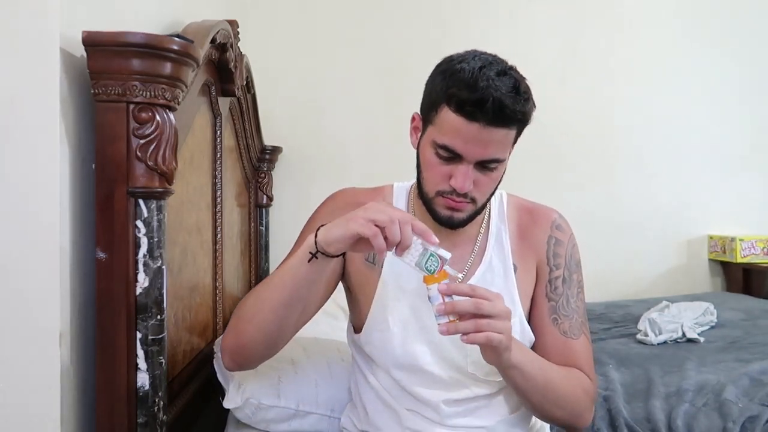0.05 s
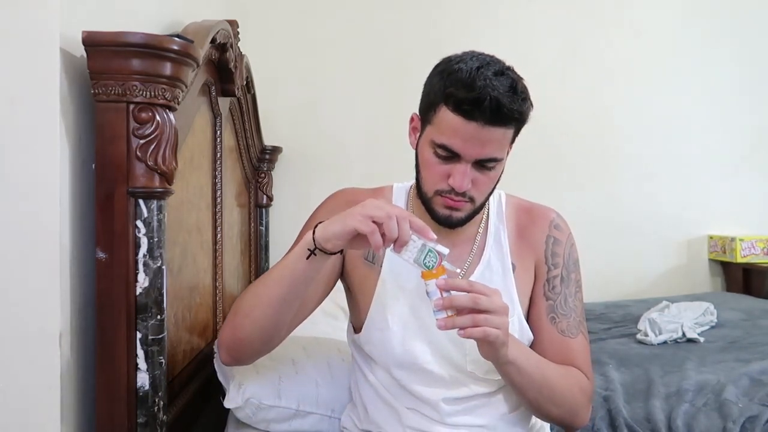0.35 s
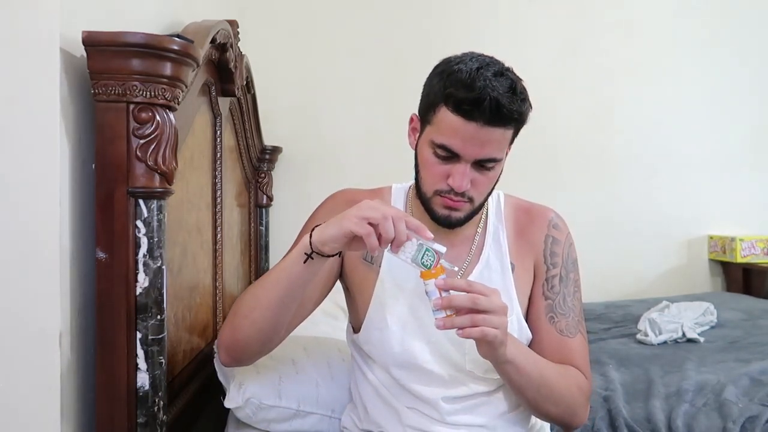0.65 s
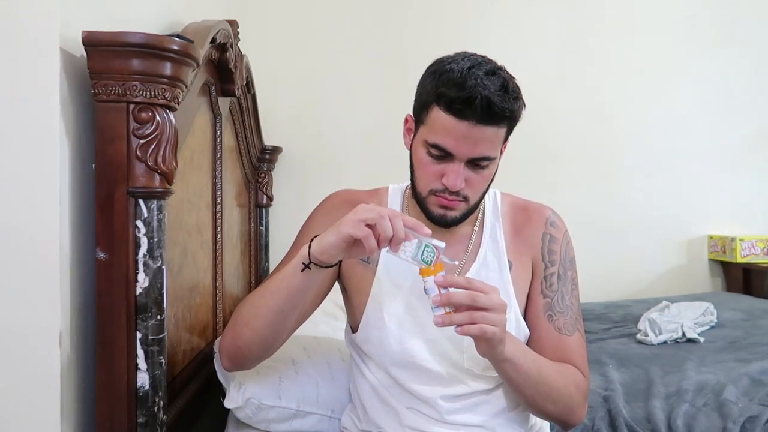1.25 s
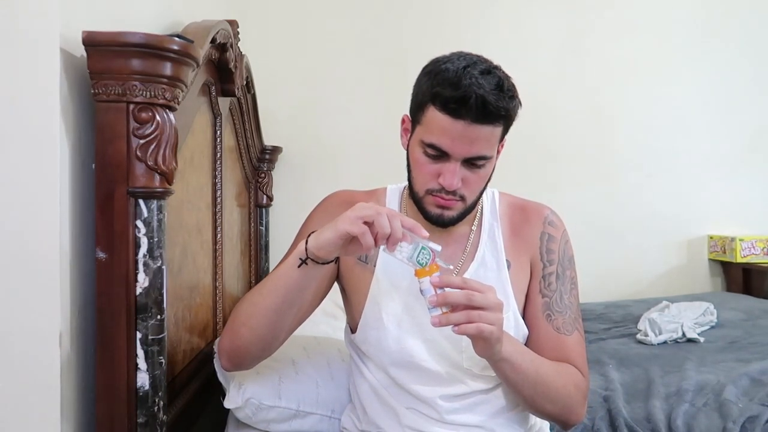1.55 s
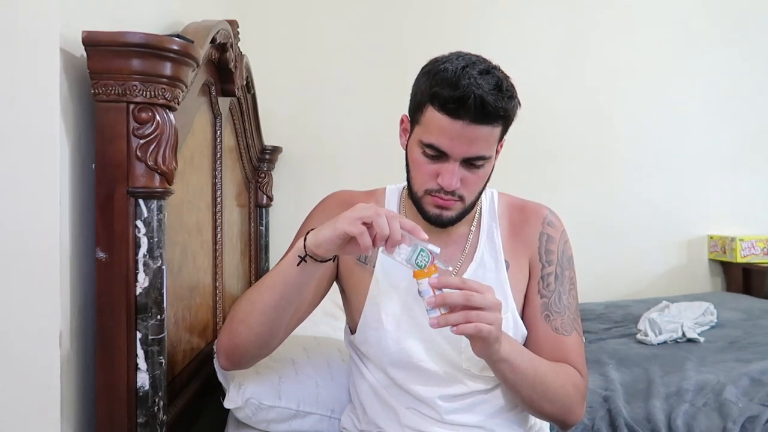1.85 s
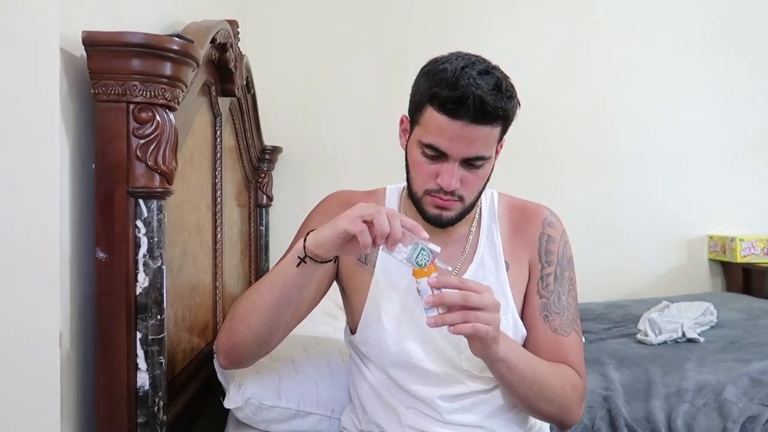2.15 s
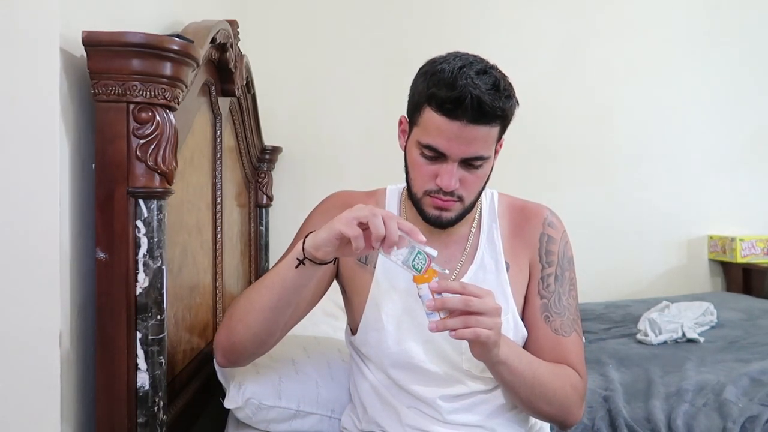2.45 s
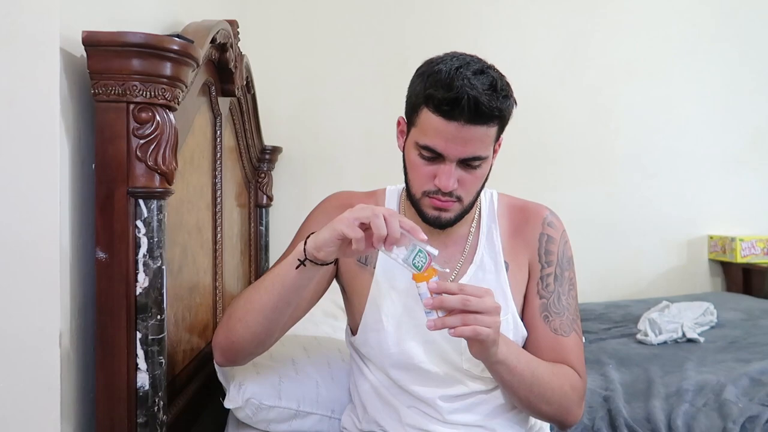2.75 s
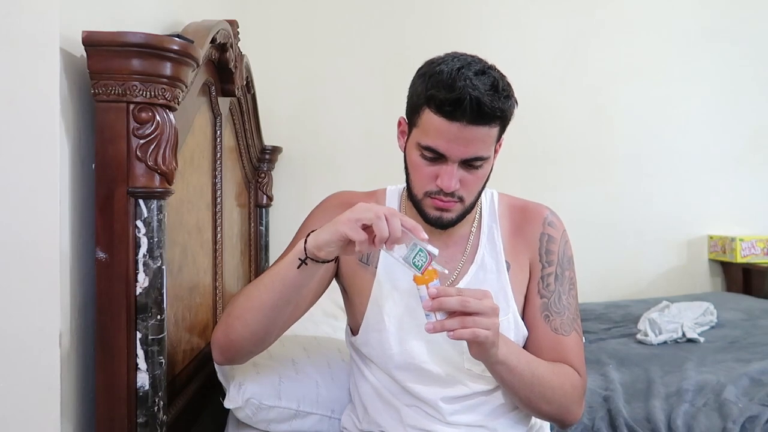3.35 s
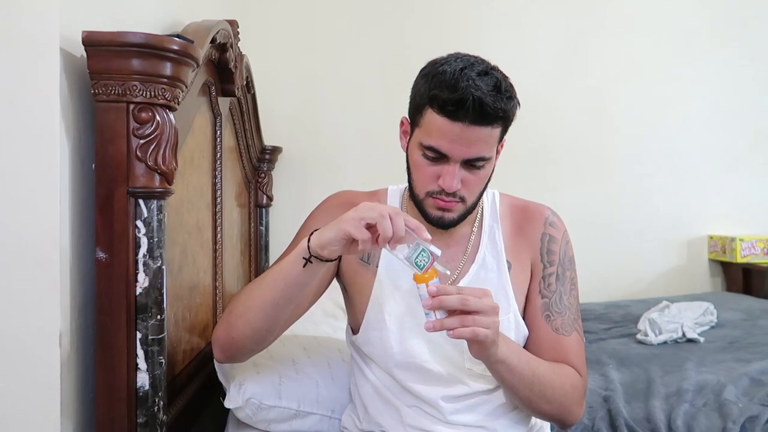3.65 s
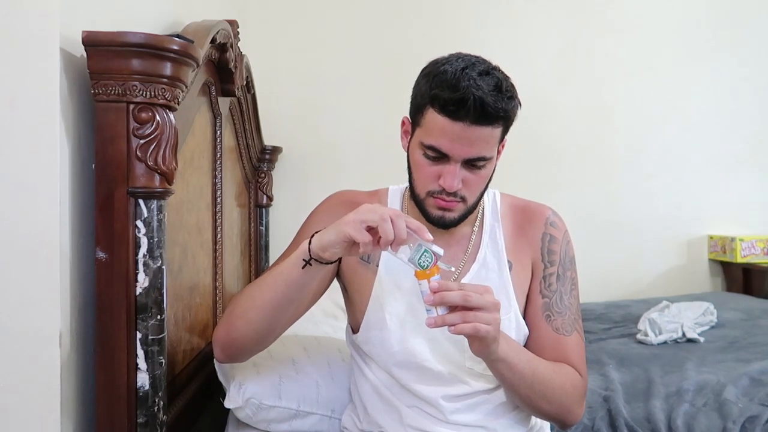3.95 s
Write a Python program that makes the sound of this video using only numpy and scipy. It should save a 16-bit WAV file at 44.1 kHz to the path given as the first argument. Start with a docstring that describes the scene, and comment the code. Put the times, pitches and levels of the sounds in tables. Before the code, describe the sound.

Light plastic clicking and rattling with short scrapes as a small container is handled.

```python
"""A small plastic container worked over a pill bottle

A man works the container in a bedroom. Hard bits strike its shell, whose damped modes tick near 3 kHz.
Scraping strokes, about six a second, grow stronger; their friction rasps over a hollow tone near 1 kHz.
Close walls reflect the sound, over a low steady hum."""
import sys
import numpy as np
from scipy import signal
from scipy.fft import rfft, irfft
from scipy.io import wavfile

SR = 44100
rng = np.random.default_rng(int(sys.argv[2]) if len(sys.argv) > 2 else 0)


def wrap_up_sound(samples):
    """Save the sound to the file named by the first command line argument, as 16-bit audio."""
    columns = np.atleast_2d(samples).T
    # keep every value between -1 and 1, then stretch to whole-number steps
    tamed = np.clip(columns, -1, 1)
    steps = np.round(tamed * 32767).astype(np.int16)
    wavfile.write(sys.argv[1], SR, steps)


N = 176400
BOUNCE_S = .0072  # delay of the reflection from a hard surface close by

# modes of the plastic shell: pitch_ratio, level_db, t60_s
SHELL_MODES = [(.92, -4, 0.019), (1.05, 3, 0.011), (.74, -29.5, 0.0023), (.47, -15, 0.012)]
# sinking pitch of the shell: time_s, pitch_hz
SHELL_PITCH = [(0, 3380), (1.6, 3363), (2.5, 3105), (3.3, 2993), (3.6, 2970), (3.9, 2720)]
# scraping strokes: start_s, rise_s, fall_s, hollow_db, rasp_db
SCRAPE_STROKES = [(.0, .03, 0.077, -35, -61), (.085, 0.014, 0.061, -44, -39),
                  (0.309, 0.02, 0.074, -34.5, -39), (.462, 0.017, 0.065, -27, -24),
                  (0.494, 0.026, 0.051, -35, -38), (.61, 0.032, 0.084, -33, -40),
                  (.945, 0.0084, 0.038, -35.5, -37), (1.125, 0.012, 0.067, -35, -33),
                  (1.294, 0.0095, 0.068, -33, -27.5), (1.39, 0.016, 0.039, -37, -43),
                  (1.45, 0.023, 0.063, -32, -31.5), (1.51, 0.025, 0.074, -39, -33),
                  (1.608, 0.011, 0.12, -28, -29), (1.765, 0.025, 0.17, -34.5, -31),
                  (1.933, 0.025, 0.14, -24, -24), (2.093, 0.042, 0.043, -21.5, -24.5),
                  (2.22, 0.026, 0.056, -32, -47), (2.3, 0.019, 0.1, -33, -28),
                  (2.395, 0.023, 0.049, -24.5, -24), (2.414, 0.036, 0.099, -19.5, -23),
                  (2.569, 0.046, 0.059, -24, -25), (2.713, 0.04, 0.093, -19.5, -22),
                  (2.888, 0.028, 0.049, -18.5, -21.5), (3.028, 0.034, 0.062, -17.5, -18.5),
                  (3.183, 0.037, 0.12, -19.5, -20.5), (3.344, 0.057, 0.087, -18.5, -21.5),
                  (3.559, 0.018, 0.19, -30, -30.5), (3.675, 0.033, 0.1, -20.5, -26),
                  (3.755, .035, 0.13, -33, -35), (3.839, 0.051, 0.056, -21, -26),
                  (3.937, 0.014, .08, -30, -29.5)]
# spectrum of rustles and scattered treble: frequency_hz, level_db
TREBLE_SPECTRUM = [(1000, -25), (2000, 4), (4000, 6.5), (5500, 9.5), (7500, 2.5), (8800, -12), (10000, -8),
                   (12500, -45), (16000, -35)]


def amp(db):
    """Amplitude ratio of a level in decibels."""
    return 10 ** (np.asarray(db) / 20)


def unit(x):
    """Normalisation to an rms of 1."""
    return x / np.sqrt(np.mean(x ** 2) + 1e-20)


def at_hz(points, hz):
    """Interpolation on a logarithmic frequency axis."""
    frequencies, values = np.transpose(points)
    return np.interp(np.log(hz + 1), np.log(frequencies), values)


def curve(points):
    """Linear interpolation in time, one value a sample."""
    return np.interp(np.arange(N) / SR, *np.transpose(points))


def add(mix, start_s, sound):
    """Superposition of a delayed sound on a mix."""
    part = mix[max(round(start_s * SR), 0):][:len(sound)]
    part += sound[:len(part)]


def colour(x, spectrum):
    """Minimum-phase filtering to a given spectrum."""
    size = 8192
    log_gain = np.log(amp(at_hz(spectrum, abs(np.fft.fftfreq(size, 1 / SR)))))
    taps = np.fft.ifft(np.exp(np.conj(signal.hilbert(log_gain)))).real[:size // 2]
    return signal.fftconvolve(x, taps)[:len(x)]


def impulses(count, per_s):
    """A Poisson train of impulses of random sign."""
    return rng.choice([-1., 1.], count) * (rng.random(count) < per_s / SR)


def grains(per_s, spread_db):
    """Shot noise: tiny random impacts of uneven size."""
    size = amp(spread_db * np.minimum(rng.exponential(1, N), 4))
    return unit(size * impulses(N, per_s))


def swell(rise_s, fall_s):
    """A smooth rise, then exponential decay by 17 dB in each fall_s."""
    t = np.arange(SR // 2) / SR
    attack = np.sin(np.pi / 2 * np.minimum(t / rise_s, 1)) ** 2
    return attack * amp(-17 * np.maximum(t - rise_s, 0) / fall_s)


def resonances(modes):
    """Impulse response of damped resonators: the narrower the band, the longer the ring."""
    t = np.arange(SR // 4) / SR
    return sum(amp(db) * 2 * np.pi * width / SR * np.exp(-np.pi * width * t) * np.cos(2 * np.pi * hz * t)
               for hz, width, db in modes)


def background():
    """Steady tones hum over two filtered noises: room air and a slowly varying rumble."""
    # hum tones: pitch_hz, level_db
    hum_tones = [(58.5, -61), (120, -54.5)]
    # spectra of the air and the rumble: frequency_hz, level_db
    air_spectrum = [(12, -30), (20, -39), (80, 2), (119, -17.5), (232, 0.5), (464, -6.5), (667, -8.5),
                    (1010, -1.5), (1270, -3.5), (2090, -2.5), (8170, -21.5), (13900, -95), (15500, -25)]
    rumble_spectrum = [(20, -5), (36, -0.5), (58, 11.5), (90, -10), (130, 1), (170, -10), (280, -4.5),
                       (350, -20), (500, -2), (900, -14.5), (3000, -61)]
    # course of the rumble: time_s, level_db
    rumble_levels = [(0, -44), (1.1, -56), (1.6, -40.5), (2.5, -42.5), (4, -44.5)]
    t = np.arange(N) / SR
    hum = sum(amp(db) * np.sqrt(2) * np.sin(2 * np.pi * (hz * t + rng.random())) for hz, db in hum_tones)
    air = amp(-41) * unit(colour(rng.standard_normal(N), air_spectrum))
    rumble = amp(curve(rumble_levels)) * unit(colour(rng.standard_normal(N), rumble_spectrum))
    return hum + air + rumble


def reverberation(x):
    """The bedroom's diffuse field decays exponentially, each band at its own rate."""
    # reverberation times: frequency_hz, t60_s
    decay_times = [(200, 0.26), (1000, 0.86), (3300, 0.26), (6000, 0.81), (14000, 0.11)]
    count = SR // 2
    taps = impulses(count, per_s=4000) * (np.arange(count) > .006 * SR)
    hz, t, bands = signal.stft(taps, SR, nperseg=256)
    decay = amp(-60 * t / at_hz(decay_times, hz)[:, None])
    tail = signal.istft(bands * decay, SR, nperseg=256)[1]
    return signal.fftconvolve(x, tail / np.linalg.norm(tail))[:N]


def furniture_scatter(x, t60_s=.085):
    """Scattering from nearby furniture gives dense, short-lived early reflections."""
    t = np.arange(SR // 6) / SR
    taps = impulses(len(t), per_s=3000) * (t > BOUNCE_S) * amp(-60 * t / t60_s)
    return signal.fftconvolve(x, taps / np.linalg.norm(taps))[:N]


def with_echoes(x):
    """Specular reflection adds delayed, weaker copies to the direct sound."""
    # echoes from nearby surfaces: delay_s, level_db
    echoes = [(.0018, -22.5), (.0072, -11.5), (.0092, -23), (.013, -23), (.0235, -30), (.0405, -29.5)]
    out = x.copy()
    for delay_s, db in echoes:
        add(out, delay_s, amp(db) * x)
    return out


def lingering_ring(x):
    """Lightly damped resonances ring on after their excitation."""
    # narrow resonances: pitch_hz, bandwidth_hz, level_db
    modes = [(2030, 18, -9), (2529, 18, -6), (2740, 20, -9), (2950, 20, -2), (3040, 25, -7), (3130, 25, -8),
             (3266, 16, -4), (3384, 30, -5), (3530, 18, -1), (3662, 22, -2), (3886, 22, -3)]
    return amp(2.5) * signal.fftconvolve(x, resonances(modes))[:N]


def struck_shell(pitch_hz):
    """Free vibration of the shell: a sum of damped sines."""
    t = np.arange(SR // 20) / SR
    return sum(amp(db - 60 * t / t60_s) * np.sin(2 * np.pi * ratio * pitch_hz * t)
               for ratio, db, t60_s in SHELL_MODES)


def driven_shell(x, bandwidth_hz=300):
    """Forced vibration of one resonance that follows the shell's sinking pitch."""
    carrier = np.exp(2j * np.pi * np.cumsum(curve(SHELL_PITCH)) / SR)
    pole = np.exp(-np.pi * bandwidth_hz / SR)
    return 2 * (carrier * signal.lfilter([1 - pole], [1, -pole], x / carrier)).real


def rattle():
    """Random impacts of small bits excite the shell's modes, surging with each stroke."""
    # fine rattle between the knocks: time_s, level_db
    rattle_levels = [(0, -45.5), (.08, -41), (.17, -34.5), (.23, -42.5), (.33, -33.5), (.43, -45.5),
                     (.6, -33.5), (.78, -40.5), (.83, -41), (1.0, -35), (1.09, -43.5), (1.18, -34),
                     (1.28, -57), (1.4, -31.5), (1.85, -41), (2.15, -35.5), (2.85, -34), (4, -34.5)]
    taps, surge = np.zeros((2, N))
    hits = grains(per_s=700, spread_db=3)
    pitch_hz = curve(SHELL_PITCH) * (1 + .035 * rng.standard_normal(N))
    steps_hz = np.geomspace(2600, 3700, 14)
    nearest = abs(pitch_hz[:, None] - steps_hz).argmin(1)
    for step, hz in enumerate(steps_hz):
        taps += signal.oaconvolve(hits * (nearest == step), struck_shell(hz))[:N]
    for start_s, rise_s, fall_s, _, rasp_db in SCRAPE_STROKES:
        add(surge, start_s, amp(rasp_db - 13.5) * swell(rise_s, fall_s) ** .94)
    return np.hypot(amp(curve(rattle_levels)), surge) * unit(taps)


def rustles():
    """Sliding friction of the contents makes thin bursts of shot noise."""
    # slides: start_s, rise_s, fall_s, level_db
    slides = [(.058, 0.0073, 0.034, -28), (.47, .06, 0.23, -36.5), (.8, 0.014, .05, -37),
              (.845, .01, 0.09, -29.5), (.92, 0.015, 0.067, -39), (1.297, 0.0069, 0.14, -47),
              (1.39, 0.014, 0.32, -50), (1.553, .01, 0.12, -43), (1.888, 0.0045, 0.054, -46),
              (2.05, .02, .2, -35.5), (2.26, 0.021, .1, -43), (3.94, 0.011, 0.11, -32)]
    envelope = np.zeros(N)
    for start_s, rise_s, fall_s, db in slides:
        add(envelope, start_s, amp(db) * swell(rise_s, fall_s))
    return envelope * unit(colour(grains(per_s=2500, spread_db=10), TREBLE_SPECTRUM))


def scrapes():
    """Friction, a stream of tiny impacts, makes a rasp and a hollow tone coloured by room resonances."""
    # narrow room resonances that colour the hollow tone near 1 kHz: pitch_hz, bandwidth_hz, level_db
    scrape_resonances = [(719, 22, -8), (841, 22, -6), (932, 40, -4), (1044, 30, 0), (1090, 22, -8),
                         (1168, 22, -10), (1190, 25, -10), (1345, 40, -13)]
    # spectra of the broad skirt around those peaks and of the rasp: frequency_hz, level_db
    skirt_spectrum = [(100, -63), (350, -48.5), (550, -22.5), (800, -4.5), (1050, 5.5), (1400, -21),
                      (2000, 6), (4000, -80.5)]
    rasp_spectrum = [(200, -31.5), (700, -16.5), (1300, -3), (1800, -10.5), (2400, 0.5), (3000, -7),
                     (3600, -4), (4200, -4), (5200, -8), (6000, -20.5), (8000, -24), (10000, -31),
                     (11500, -69), (15000, -52)]
    hollow_envelope, rasp_envelope = np.zeros((2, N))
    for start_s, rise_s, fall_s, hollow_db, rasp_db in SCRAPE_STROKES:
        add(hollow_envelope, start_s, amp(hollow_db) * swell(rise_s, fall_s))
        add(rasp_envelope, start_s, amp(rasp_db) * swell(rise_s, fall_s))
    response = resonances(scrape_resonances)
    excitation = hollow_envelope * grains(per_s=4000, spread_db=4.5)
    ring = signal.fftconvolve(excitation, response / np.linalg.norm(response))[:N]
    skirt = hollow_envelope * unit(colour(grains(per_s=4000, spread_db=.67), skirt_spectrum))
    rasp = rasp_envelope * unit(colour(grains(per_s=4000, spread_db=5), rasp_spectrum))
    return amp(-3) * ring + amp(-7) * skirt, rasp


def knocks():
    """Impacts excite the shell's modes; returns the ring, the snap and a scattered-treble envelope."""
    # knocks in the container: start_s, level_db, pitch_hz, snap_re_ring_db
    impacts = [(0.0626, -9, 3230, -7.5), (0.0748, -7, 3350, -16), (0.1357, -10, 3230, -28),
               (0.1427, -7.5, 3250, -31), (0.2473, 1.5, 3080, -13), (0.2879, -12, 3170, -28),
               (0.3191, -15, 3220, -18), (0.557, -6, 3320, -9.5), (0.5679, -5.5, 3250, -25),
               (0.5855, 3.5, 3260, -23), (0.6113, -23, 3380, -18), (0.6859, -3.5, 3350, -13),
               (0.7087, -14.5, 3200, -13), (0.8012, -10.5, 3560, -14), (0.8059, -8, 3500, -22),
               (0.8209, -7, 3290, -20), (0.847, -10.5, 3280, -21), (0.852, -7.5, 3300, -28),
               (0.8597, -17.5, 3450, -15), (0.8901, -17, 3400, -12), (0.9202, -6.5, 3300, -15),
               (0.9257, -12, 3200, -22), (0.9827, -14.5, 3170, -25), (0.9972, -13, 3410, -19),
               (1.0506, -17.5, 3400, -24), (1.1663, -10.5, 3530, -23), (1.171, -10, 3400, -23),
               (1.3047, -9.5, 3150, -10.5), (1.3372, -10, 3300, -17), (1.3997, -13, 3490, -7.5),
               (1.4085, -3.5, 3320, -22), (1.415, -5.5, 3290, -21), (1.4737, -12, 3440, -14.5),
               (1.5561, -8, 3170, -14.5), (1.5612, -6, 3320, -18), (1.6503, -9, 3350, -13.5),
               (1.7129, -1, 3210, -12.5), (1.891, -7.5, 3440, -8), (1.9411, -13, 3350, -26),
               (1.9806, -11.5, 3270, -11), (2.0566, -2.5, 3370, -10.5), (2.118, -11, 2970, -16),
               (2.1644, -7.5, 3350, -13), (2.1804, -4, 3220, -11.5), (2.2639, -6.5, 2960, -12),
               (2.2774, -12, 3140, -22), (2.323, -14.5, 3200, -5.5), (2.3477, -12.5, 3070, -11),
               (2.3992, -10, 2740, -21), (2.4141, -3, 2600, -34), (2.429, -15, 3050, -26),
               (2.4412, -14, 3120, -23), (2.4504, -3, 3200, -19), (2.5335, -6.5, 3140, -12.5),
               (2.5979, -21, 3320, -22), (2.6112, -13.5, 3400, -10), (2.736, -11, 2840, -30),
               (2.7653, -2.5, 3180, -14), (2.903, -19, 3050, -23), (2.9129, -6, 3270, -17),
               (3.0473, -5.5, 2860, -35), (3.0509, -9, 3040, -36), (3.1879, -12.5, 3000, -13),
               (3.205, -4.5, 2680, -36), (3.2318, -1, 3020, -16.5), (3.2845, -3.5, 3180, -18.5),
               (3.312, -8.5, 2910, -10), (3.3551, -10, 3300, -21), (3.3793, -16, 3160, -29),
               (3.3892, -7, 2840, -35), (3.437, -11, 3340, -6), (3.4631, -4.5, 3490, -14),
               (3.4946, -10, 3000, -16), (3.5697, -4, 3270, -15.5), (3.599, -21, 3080, -1),
               (3.6157, -4.5, 2980, -14), (3.6245, -6, 3010, -11), (3.71, -22, 2920, -14),
               (3.7172, -9.5, 3000, -9.5), (3.767, -20.5, 3100, 1), (3.809, -12, 3030, -13),
               (3.8144, -10, 3450, -7), (3.9502, -28, 3060, 6), (3.9623, -18, 2780, 0)]
    # spectrum of the snap: frequency_hz, level_db
    snap_spectrum = [(700, -22), (1500, -7.5), (3000, 0), (4500, 4), (5500, 5.5), (6500, -9.5), (7700, -4),
                     (8800, -13), (10000, -12.5), (12500, -22.5), (15500, -28)]
    rise_s, snap_decay_s = .00027, .00075
    spray_rise_s, spray_t60_s = .0085, .21
    t = np.arange(SR // 20) / SR
    attack = 1 - np.exp(-(t / rise_s) ** 2)
    snap_shape = attack * np.exp(-t / snap_decay_s)
    spray_t = np.arange(SR // 2) / SR
    spray_shape = (1 - np.exp(-spray_t / spray_rise_s)) * amp(-60 * spray_t / spray_t60_s)
    ring, snap_envelope, spray_power = np.zeros((3, N))
    for start_s, db, pitch_hz, snap_db in impacts:
        add(ring, start_s, amp(db - 3.5) * attack * struck_shell(pitch_hz))
        add(snap_envelope, start_s, amp(db + snap_db - 1.5) * snap_shape)
        add(spray_power, start_s, (amp(db + snap_db - 6.5) * spray_shape) ** 2)
    snap = snap_envelope * unit(colour(rng.standard_normal(N), snap_spectrum))
    return ring, snap, np.sqrt(spray_power)


def scene():
    """Direct and diffuse sound superpose in mid and side: near-mono bass, wide treble."""
    # filter on the scattered snap, and side relative to mid: frequency_hz, gain_db
    snap_scatter = [(1000, -28), (5000, -5.5), (8000, 10), (12000, 17), (15000, -6)]
    side_gains = [(30, -42), (60, -50), (120, -27), (300, -13.5), (700, -18.5), (1400, -22), (3000, -11.5),
                  (4500, -4.5), (6500, 0.5), (9000, 7.5), (13000, 14.5)]
    ring, snap, spray_envelope = knocks()
    hollow_tone, rasp = scrapes()
    friction = amp(-3.5) * (rasp + rustles())
    friction += amp(7) * driven_shell(friction)
    impacts = ring + snap + rattle()
    add(impacts, BOUNCE_S, amp(-4) * snap)  # a hard surface throws the snap back
    contact = impacts + friction
    direct = with_echoes(contact) + hollow_tone + lingering_ring(contact)
    to_room = amp(-8) * impacts + amp(-5.5) * (friction + .65 * hollow_tone)
    to_furniture = amp(-8) * contact + amp(-3.5) * colour(snap, snap_scatter)

    def diffuse_field():
        """Random scattering makes each call a decorrelated field."""
        field = reverberation(to_room) + furniture_scatter(to_furniture) + background()
        spray = unit(colour(grains(per_s=6000, spread_db=1.6), TREBLE_SPECTRUM))
        return field + spray_envelope * spray / 2

    mid = direct + diffuse_field()
    width = amp(at_hz(side_gains, np.fft.rfftfreq(N, 1 / SR)))
    quadrature = 1j * amp(-9) * rfft(direct)  # a 90-degree shift widens without panning
    side = irfft((rfft(diffuse_field()) + quadrature) * width, N)
    balance = amp(-.2)
    return np.array([(mid + side) * balance, (mid - side) / balance])


def record(dry):
    """Hard clipping at full scale, then a low-pass band limit."""
    cutoff_hz = 15500
    lowpass = signal.firwin(511, cutoff_hz, window=("kaiser", 9), fs=SR)
    return signal.oaconvolve(np.clip(dry, -1, 1), lowpass[None], "same")


dry = scene()
out = record(dry)
wrap_up_sound(out)
```